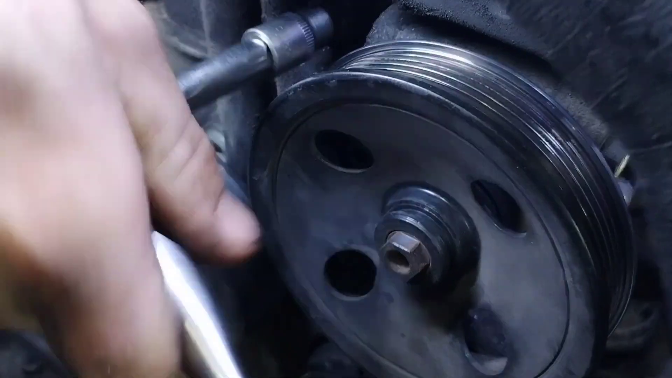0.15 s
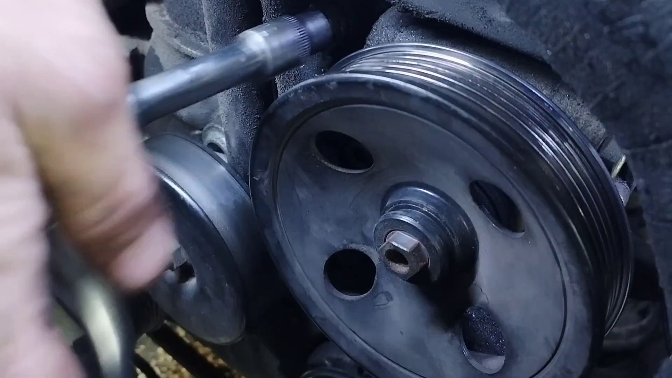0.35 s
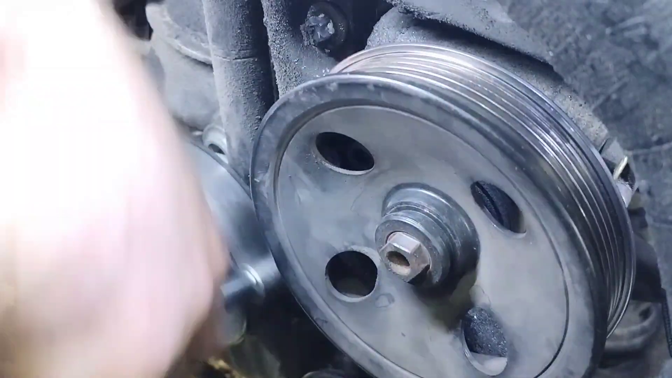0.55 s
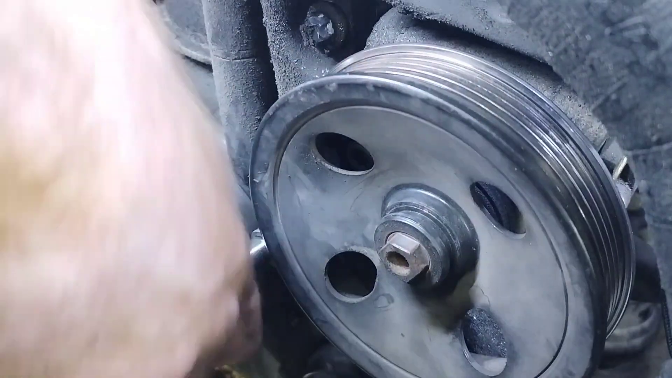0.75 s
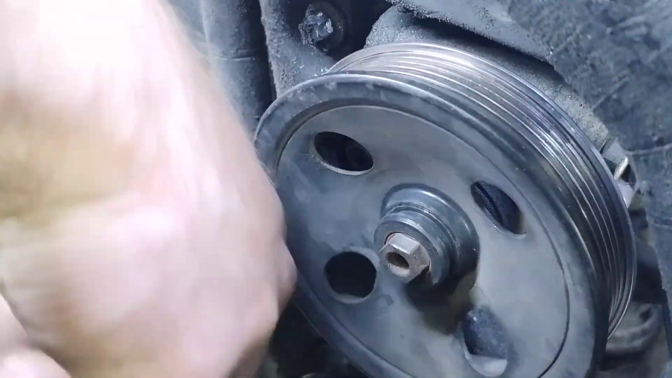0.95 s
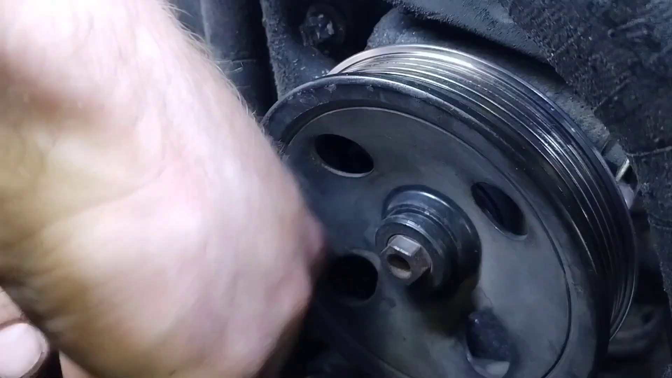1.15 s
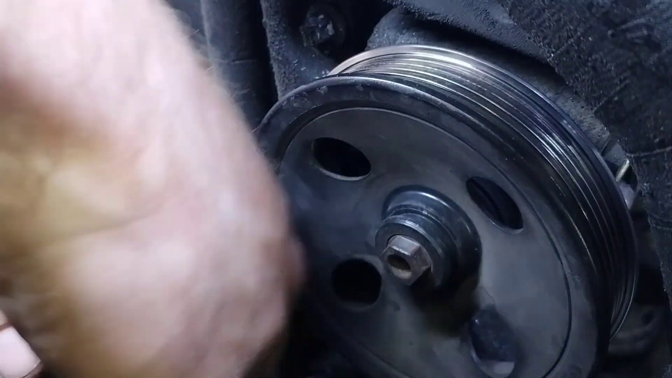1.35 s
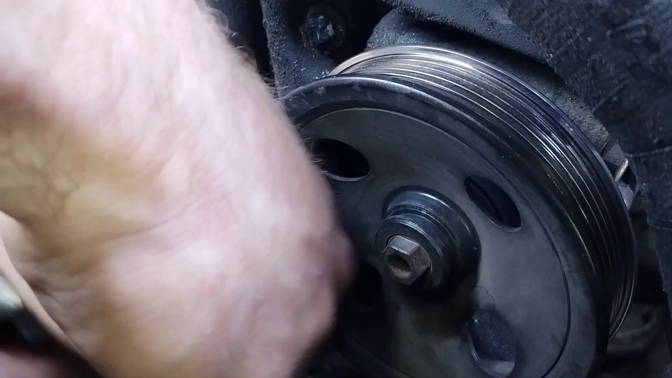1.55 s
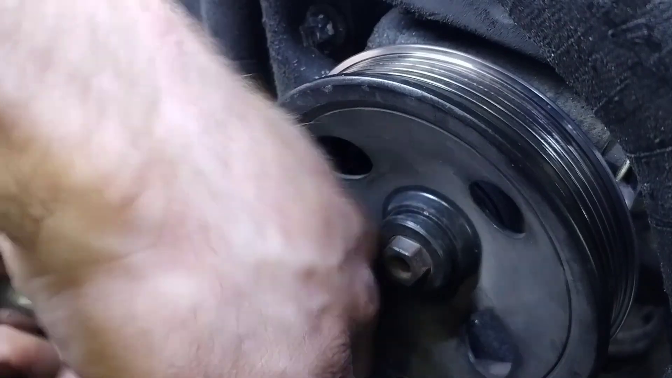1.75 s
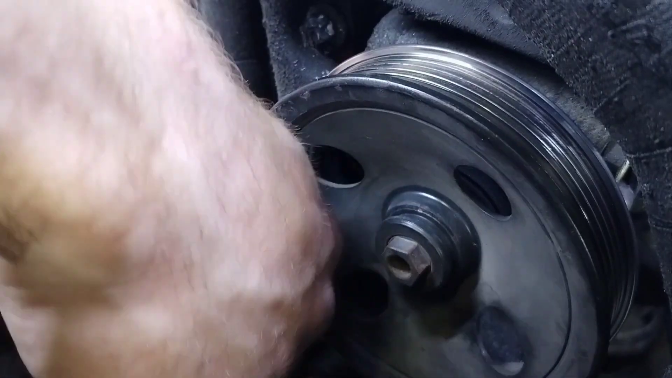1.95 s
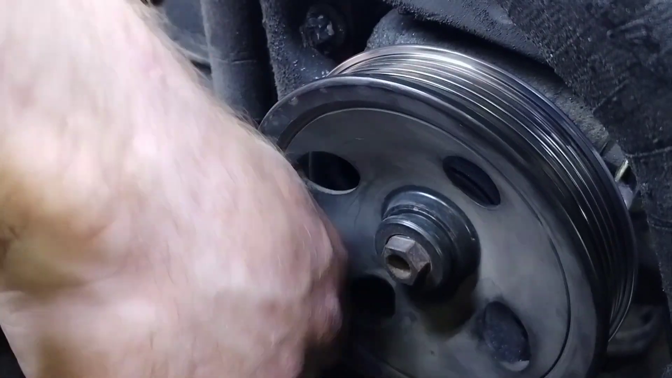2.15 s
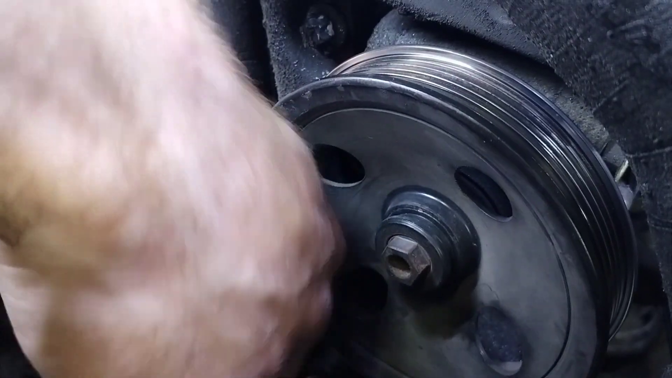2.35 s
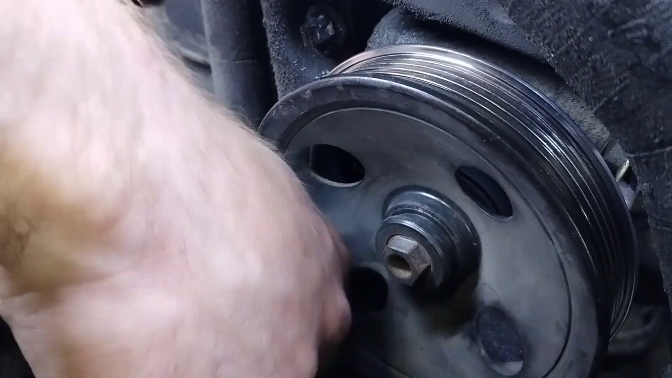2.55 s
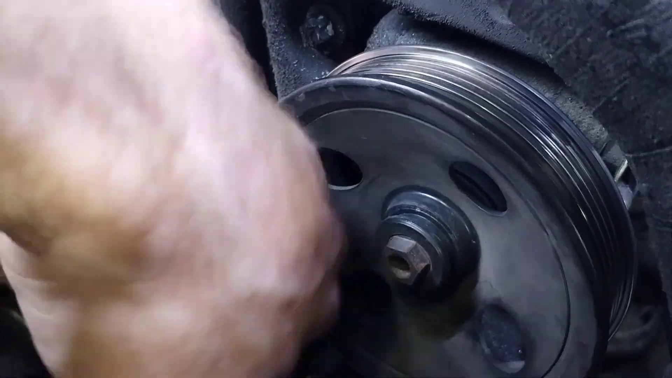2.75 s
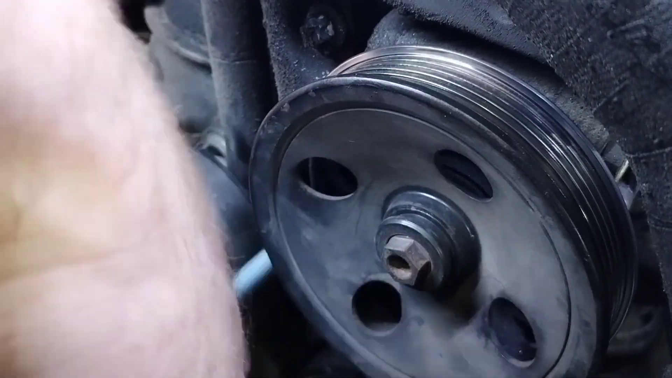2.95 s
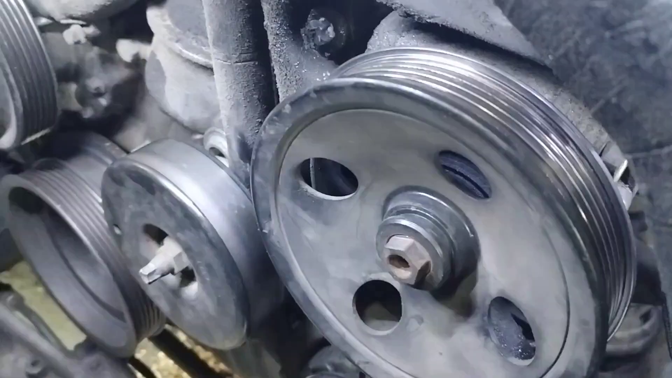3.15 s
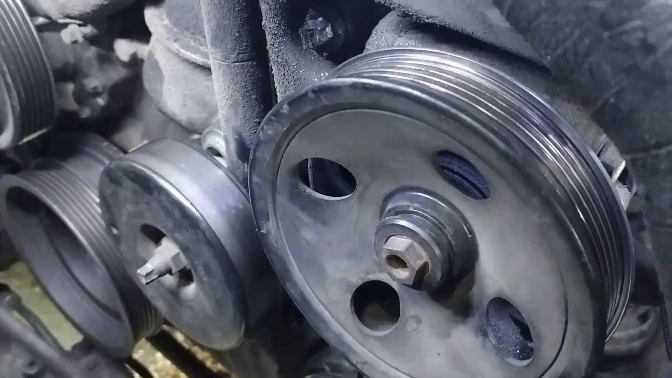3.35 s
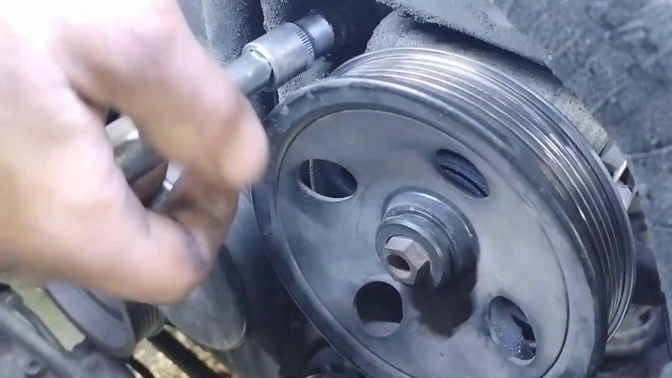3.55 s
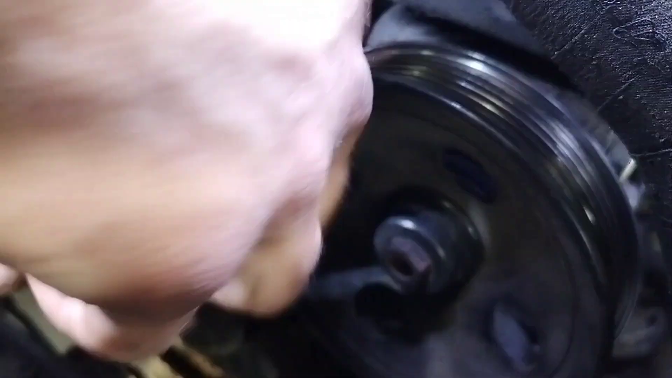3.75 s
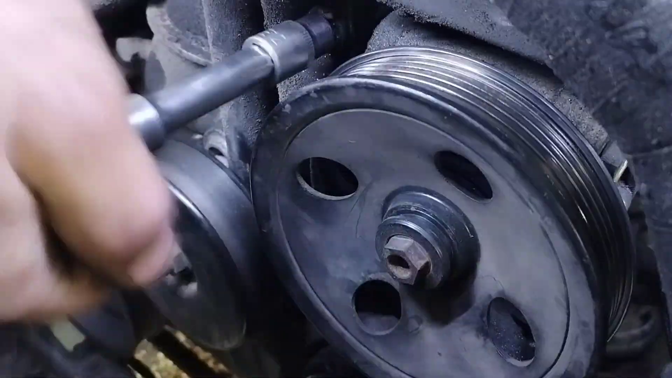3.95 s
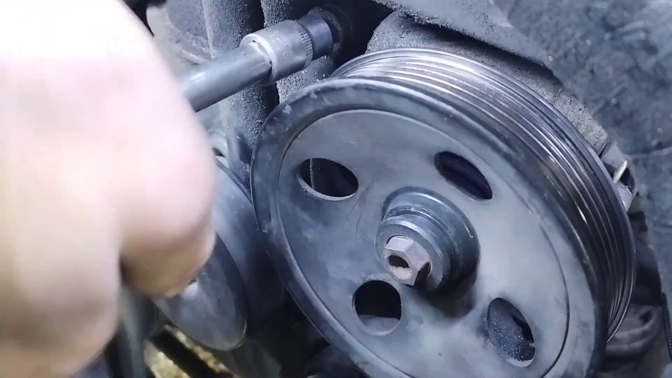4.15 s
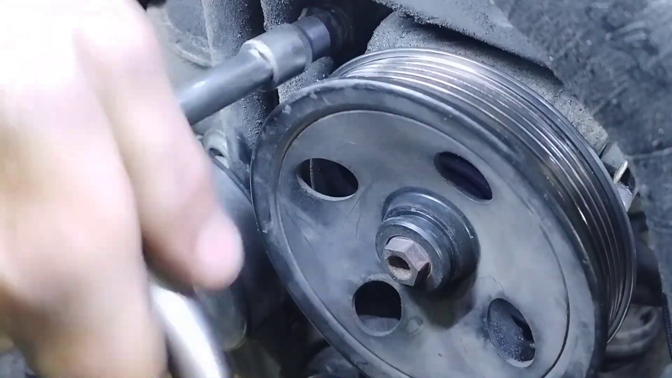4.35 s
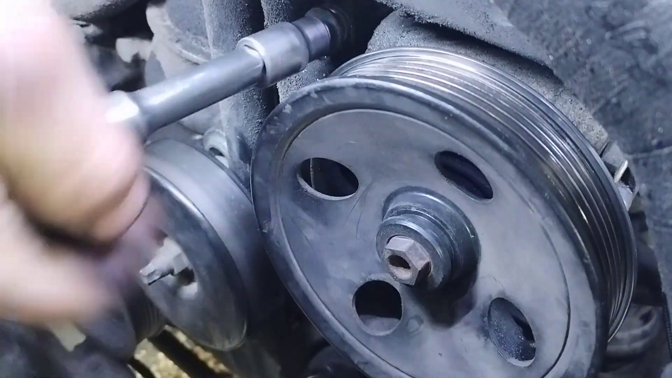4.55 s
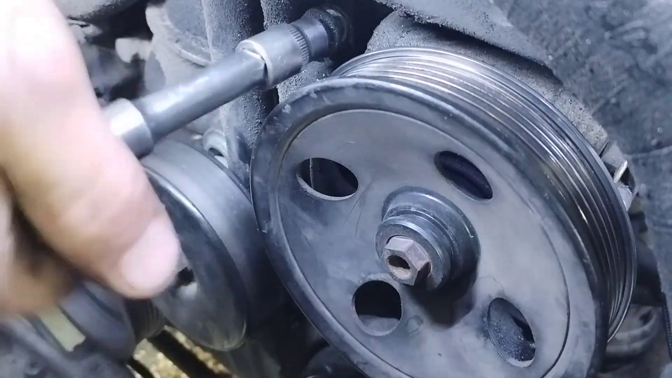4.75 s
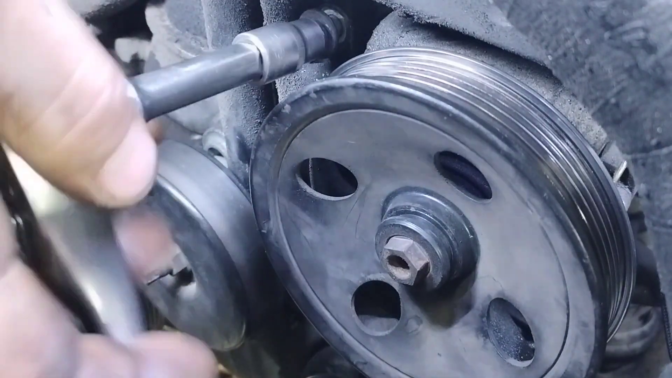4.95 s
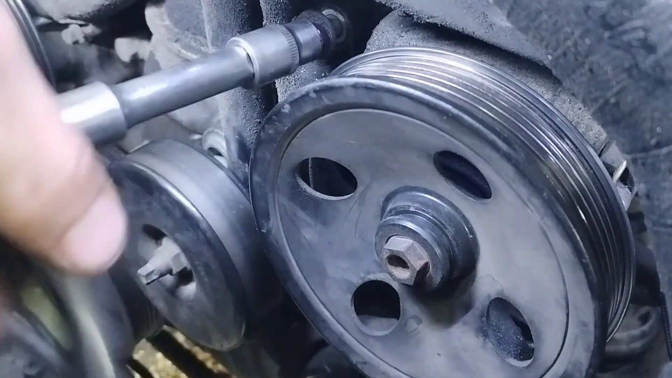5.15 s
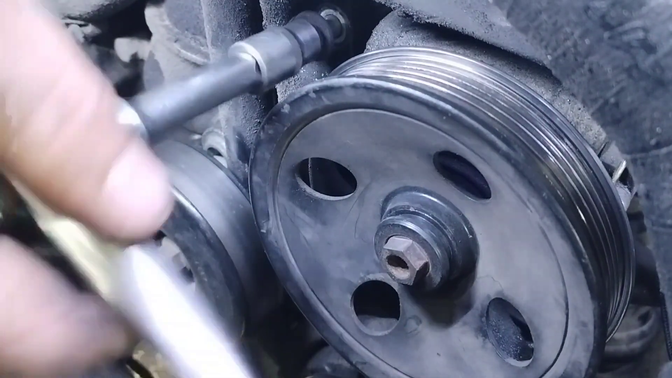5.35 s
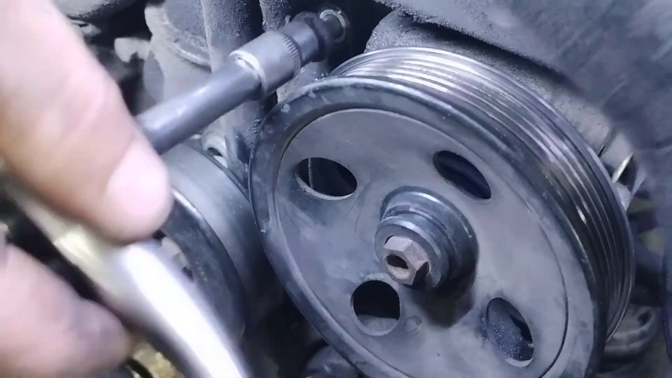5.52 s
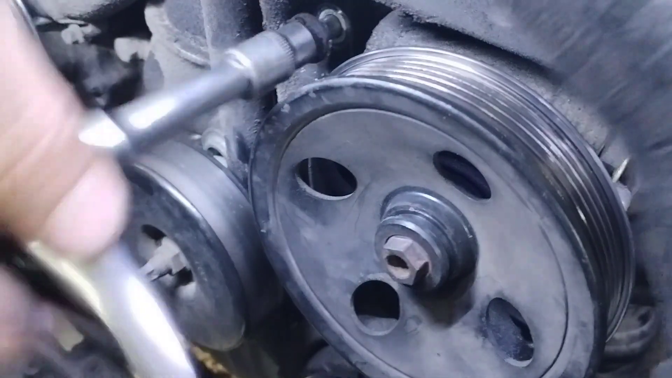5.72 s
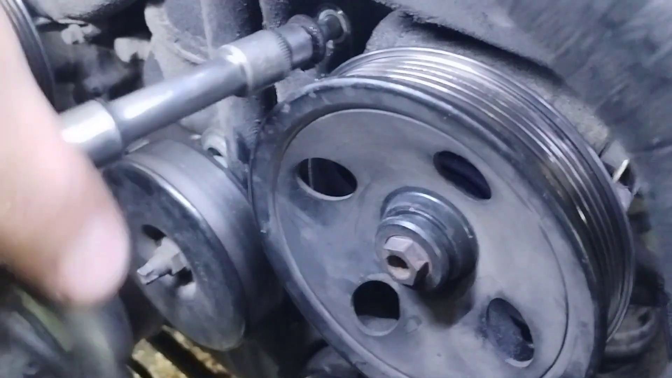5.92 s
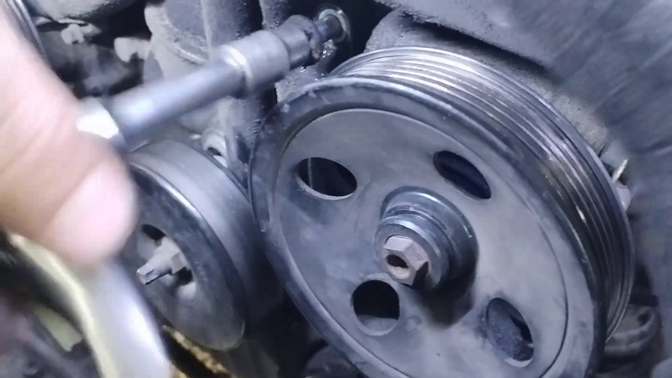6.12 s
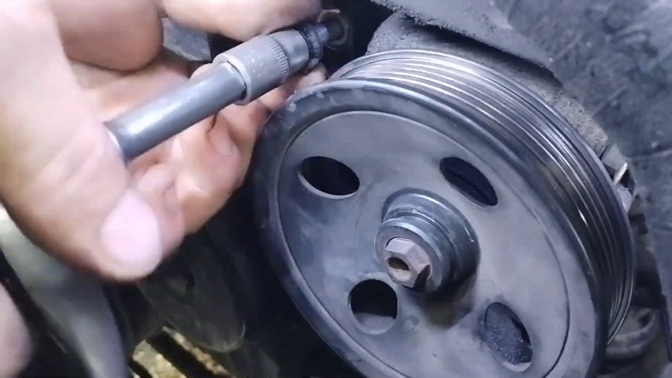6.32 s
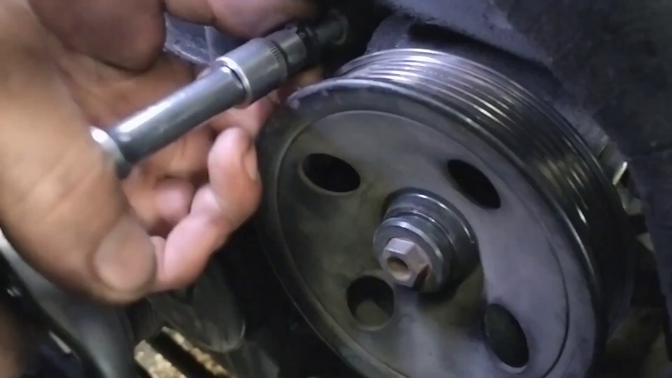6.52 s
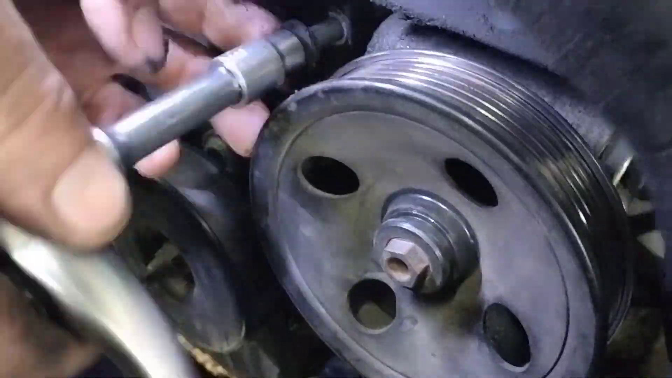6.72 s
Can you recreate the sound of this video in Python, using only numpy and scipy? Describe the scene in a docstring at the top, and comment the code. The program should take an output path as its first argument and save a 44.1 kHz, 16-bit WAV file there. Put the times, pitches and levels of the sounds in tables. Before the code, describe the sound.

A mechanic's hand tool, heard close in stereo with the engine silent. Crisp ratchet clicks come in bursts at first, with one short ringing chime. The middle is sparse: faint finger ticks, then bumps, clinks and light socket taps. Afterward rapid bright clicking strokes return and persist, mixed with metallic knocks, hand rustle and a soft lumpy low rumble.

```python
"""A socket ratchet works bolts in an engine bay, close by, with the engine off.
It opens on a knock and a first quick run; a steel tool chimes at half a second, then more runs follow.
In the middle the tool clinks and bumps as it is moved, and a loose socket is tapped as it is fitted.
From about 3.9 s runs of strokes return to the end, among knocks: a pawl drags over teeth, ringing steel.
Rustle, finger ticks and a lumpy low rumble lie beneath: filtered noise and tiny random contacts."""
import sys
import numpy as np
from scipy import signal
from scipy.fft import rfft, irfft
from scipy.io import wavfile
from scipy.ndimage import uniform_filter1d

SR = 44100
rng = np.random.default_rng(int(sys.argv[2]) if len(sys.argv) > 2 else 0)


def dump_mix(stems):
    """Bounce the given channels to the path in sys.argv[1] as a 16-bit WAV at rate SR."""
    frames = np.atleast_2d(stems).T  # one column per channel
    limited = np.clip(frames, -1, 1)  # hard clip at full scale
    pcm = np.round(limited * 32767).astype(np.int16)
    wavfile.write(sys.argv[1], SR, pcm)


N = 303584  # samples

# Evenly paced runs of ratchet strokes, before the hand's spread:
# [first t/s, last t/s, strokes, stroke length/s, head level/dB, rattle level/dB, swell first to last/dB]
STROKE_RUNS = [(0.038, 0.179, 4, 0.0098, -23.5, -34, -4), (0.796, 0.983, 3, 0.022, -30.5, -44.5, 12.5),
               (1.062, 1.176, 3, 0.032, -24.5, -45.5, -3), (1.232, 1.386, 4, 0.023, -23.5, -46, 7.5),
               (3.907, 4.106, 5, 0.02, -25, -39, -1.5), (4.256, 4.4, 4, .011, -26, -40, -0.5),
               (4.541, 4.676, 4, 0.022, -24.5, -37, 2), (4.727, 4.863, 4, .016, -23.5, -38.5, 3.5),
               (4.911, 5, 3, 0.016, -27.5, -39, -8.5), (5.047, 5.204, 5, .015, -22, -36.5, 0),
               (5.23, 5.348, 4, 0.019, -24, -34.5, -1.5), (5.386, 5.673, 8, .017, -22, -38.5, -0.5),
               (5.706, 6.07, 10, .024, -23, -35, 1), (6.106, 6.296, 6, 0.023, -25.5, -41.5, -6.5),
               (6.394, 6.487, 3, 0.036, -27.5, -43, -3.5), (6.579, 6.827, 7, .018, -24, -41.5, -2)]
# Single clinks as the tool is lifted, moved and seated: [t/s, length/s, head level/dB, rattle level/dB]
TOOL_CLINKS = [(0.002, 0.0041, -30, -61), (0.234, 0.0058, -25, -32), (0.263, .022, -30.5, -38.5),
               (0.341, 0.018, -27.5, -44), (0.456, 0.0068, -33.5, -33.5), (0.595, .009, -24, -29),
               (1.523, 0.0071, -16, -30), (1.761, 0.008, -32, -50), (1.804, .012, -35.5, -54),
               (1.92, 0.0049, -40, -51), (1.986, 0.0068, -40, -65), (2.009, 0.0076, -61, -47.5),
               (2.107, 0.015, -59.5, -55.5), (2.343, 0.0075, -49, -47.5), (2.39, 0.013, -56.5, -56),
               (2.522, .009, -52.5, -54), (2.797, 0.0056, -49.5, -35), (2.886, 0.013, -36, -36.5),
               (2.958, .025, -30.5, -34.5), (3.079, .006, -29, -39.5), (3.382, 0.0015, -30.5, -68),
               (3.409, 0.0052, -33.5, -30.5), (3.434, .012, -38, -50), (3.479, 0.0071, -19, -35.5),
               (3.682, 0.0048, -27, -28), (3.714, 0.027, -34, -39.5), (4.451, .03, -23.5, -40)]
# Ringing of the steel ratchet head: [f/Hz, relative level/dB]
HEAD_SPECTRUM = [(2000, -41.5), (3000, -11.5), (3700, -9), (4300, -2), (5000, -6.5), (5600, -7), (7000, -4),
                 (7900, 2), (8800, 2), (10200, -10), (14200, -17), (14600, -43.5)]
# Lower, fuller tilt added to the head on the first bolt: [f/Hz, added level/dB]
FIRST_BOLT_TILT = [(3000, 3), (4600, 2), (7000, 1), (13000, 1.5)]
# Rattle of socket and handle: [f/Hz, relative level/dB]
RATTLE_SPECTRUM = [(60, -27.5), (400, -9), (650, -1), (950, -3.5), (1700, 2.5), (2800, 3), (3500, -4.5),
                   (5000, -28.5), (14000, -42), (15500, -61.5)]
# Tool and hand bumping the engine: [t/s, contact length/s, thud level/dB, clank level before trim/dB]
ENGINE_KNOCKS = [(0.002, 0.0051, -18.5, -22), (0.088, 0.004, -12, -13.5), (0.098, 0.0098, -26, -20),
                 (0.131, 0.013, -35, -41), (0.411, 0.0078, -25.5, -26), (0.819, 0.054, -51, -62.5),
                 (1.541, .014, -36, -38), (1.615, 0.018, -29.5, -45.5), (1.804, 0.0064, -37.5, -25.5),
                 (2.45, 0.029, -53.5, -77), (2.941, 0.0052, -13.5, -24), (2.977, 0.0053, -21.5, -29.5),
                 (3.019, 0.0062, -34, -61), (3.095, 0.0087, -24, -27.5), (3.17, 0.013, -29, -28),
                 (3.265, 0.02, -38.5, -46), (3.48, 0.0072, -33, -27.5), (4.17, 0.011, -38.5, -48),
                 (4.309, 0.0061, -29.5, -19.5), (4.915, 0.00477, -31, -23.5), (5.273, 0.0037, -17.5, -18),
                 (5.313, 0.0047, -16, -9.5), (5.346, 0.0079, -26.5, -23.5), (5.51, 0.016, -32.5, -29.5),
                 (6.164, 0.0067, -30.5, -36), (6.403, 0.016, -22.5, -22.5), (6.453, 0.021, -29, -51),
                 (6.5, 0.0072, -22, -32)]
# Lower and upper thud modes, and the clanking handle: [f/Hz, relative level/dB]
LOW_THUD_SPECTRUM = [(30, -33), (170, -3.5), (350, 3), (450, -4), (1500, -54)]
HIGH_THUD_SPECTRUM = [(250, -34), (490, 0), (600, -3.5), (710, -2.5), (850, -8.5), (1100, -10.5),
                      (3000, -60.5), (15000, -81.5)]
CLANK_SPECTRUM = [(900, -33.5), (1100, -7.5), (1400, -4), (1680, 0), (1850, 1), (2150, -7.5), (3300, -11),
                  (8000, -18.5), (14000, -31.5), (15500, -61)]
# Tool sliding against hand and engine, before the lumps: [start t/s, end t/s, hiss level/dB]
TOOL_SLIDES = [(0, .58, -58.5), (.6, 1.48, -60), (2.88, 3.13, -57.5), (3.77, 3.83, -60.5), (6.5, 6.58, -50)]
# Taps on the loose socket: [t/s, level/dB]
LOOSE_SOCKET_TAPS = [(2.797, -44), (3.17, -39.5), (3.409, -35.5), (3.436, -37)]
# Ringing modes of the loose socket: [f/Hz, relative level/dB, t60/s]
SOCKET_MODES = [(2930, -2, 0.081), (5300, -10.5, .045), (6850, -9, 0.057)]
# Bending modes of the chiming steel tool: [f/Hz, relative level/dB, t60/s]
CHIME_MODES = [(870, -23, .3), (1020, -21.5, 0.17), (2216, -22.5, 0.75), (3528, -6, 0.07),
               (5060, -10.5, 0.16), (6880, -1, 0.054), (8980, 1.5, 0.034), (11290, -10.5, 0.026),
               (13970, -25.5, .06)]
# Shuffling of hands and tool: [t/s, rustle level before trim and lumps/dB]
RUSTLE_CURVE = [(0.0, -64), (0.21, -50.5), (0.38, -62), (0.69, -60.5), (1.38, -69.5), (1.65, -53),
                (1.88, -92), (2.28, -79.5), (3.05, -56), (3.51, -71), (3.91, -57), (4.16, -54.5),
                (4.46, -61), (4.96, -56), (5.14, -51.5), (5.73, -54.5), (5.96, -52), (6.88, -53.5)]
# Tone of the shuffling: [f/Hz, relative level/dB]
RUSTLE_SPECTRUM = [(60, -28.5), (200, -10), (270, -6.5), (345, 0), (430, -9.5), (1100, -19.5), (1800, -22),
                   (3500, -29), (6500, -37), (8300, -26.5), (10500, -40), (14000, -46), (15500, -65.5)]
# Rise and fall of the low rumble: [t/s, level before trim and lumps/dB]
RUMBLE_CURVE = [(0, -60), (.35, -64), (1.099, -85), (2.25, -80.5), (2.458, -55.5), (2.65, -77.5),
                (3.051, -48), (3.55, -70.5), (4.9, -82), (5.5, -58.5), (6.1, -49.5), (6.34, -59),
                (6.48, -41), (6.7, -63), (6.88, -41.5)]
# Tone of the low rumble: [f/Hz, relative level/dB]
RUMBLE_SPECTRUM = [(20, -9), (70, -4), (140, -5.5), (600, -50.5)]
# Left-right likeness at the two microphone ports: [f/Hz, correlation]
PORT_LIKENESS = [(60, 0.94), (300, 0.6), (600, 0.88), (1150, -0.5), (1700, 0.33), (2600, -0.23),
                 (4000, -0.01), (6000, 0.01)]
# Balance of the two ports: [f/Hz, left minus right level/dB]
PORT_BALANCE = [(500, -2), (1700, -3.5), (2700, 1), (4300, -2), (7100, 2.5), (7950, 9), (8900, -1),
                (12000, 1.5)]
# Level below which the noise suppressor turns a band down: [f/Hz, level per Hz/dB]
QUIET_THRESHOLD = [(100, -116), (400, -112), (1500, -111), (4000, -112), (8300, -114), (14000, -114)]

TEETH_PER_S = 165  # typical pace; it differs a little from stroke to stroke
LEAD_S = .005  # the parts scrape for this long before they catch
FIRST_BOLT_END_S = 2.5
# The hand is not a machine: spread of a run's strokes in time, strength and (log) length
STROKE_JITTER_S, STROKE_SPREAD_DB, LENGTH_SPREAD = 0.0012, 2.63, 0.24
RATTLE_SPREAD_DB = -1  # the socket sits more or less loosely at each stroke
# Hard drops of the pawl: share of the strokes, level over the stroke, level cap on the snaps
SNAP_CHANCE, SNAP_DB, SNAP_CAP_DB = 0.34, 5, -17
# A brief contact is a hard one: thud modes are even at this length; upper over lower gains per halving
EVEN_CONTACT_S, HARD_DB_PER_HALVING = 0.011, 8.5
DRAG_DB = -33.5  # rub of the socket on the bolt, relative to the strokes of its run
HISS_FLOOR_DB = -74  # faint steady hiss underneath, between the rubs and slides; before the lumps
CHIME_S, CHIME_DAMPED_S, CHIME_DB = 0.495, .594, -20
CUTOFF_HZ, FULL_SCALE = 15600, .9


def ratchet():
    """The teeth ring the steel head brightly and rattle the socket and handle lower down."""
    out = np.zeros((2, N))
    head, rattle = colour(HEAD_SPECTRUM), colour(RATTLE_SPECTRUM)
    first_head = colour([(hz, db + read(FIRST_BOLT_TILT, hz)) for hz, db in HEAD_SPECTRUM])
    worked = strokes()
    for s, length, head_db, rattle_db in worked + list(TOOL_CLINKS):
        steel = first_head if s < FIRST_BOLT_END_S else head
        clicks = pawl(length)
        bright = ring(scatter(clicks, t60=0.016, direct=0.53), steel)
        add(out, s - LEAD_S, at_level(bright, head_db, length))
        body = ring(scatter(clicks, t60=0.052, direct=0.46), rattle)
        add(out, s - LEAD_S, at_level(body, rattle_db, length))

    for s, length, head_db, _ in worked:
        luck, place = rng.random(2)
        snap_db = min(head_db + SNAP_DB, SNAP_CAP_DB)
        snap = at_level(ring(scatter(np.ones(1), t60=.014, direct=.9), head), snap_db, .002)
        add(out, s + place * length, snap * (luck < SNAP_CHANCE))
    return out


def strokes():
    """Spreads runs into (t/s, length/s, head/dB, rattle/dB); shorter strokes concentrate the same energy."""
    rows = []
    for first, last, count, length, head_db, rattle_db, swell_db in STROKE_RUNS:
        for along in np.linspace(0, 1, round(count)):
            late, strong, long, loose = rng.standard_normal(4)
            s = first + along * (last - first) + STROKE_JITTER_S * late
            stretch = np.exp(LENGTH_SPREAD * long)
            effort_db = swell_db * (along - .5) + STROKE_SPREAD_DB * strong
            effort_db -= 10 * np.log10(stretch)
            loose_db = RATTLE_SPREAD_DB * loose
            rows.append((s, length * stretch, head_db + effort_db, rattle_db + effort_db + loose_db))
    return rows


def pawl(length, grit=0.26, rebound=0.35, rebound_s=0.0015, uneven_db=2.0, count=12):
    """The pawl drops over evenly spaced teeth, rebounds after each and scrapes up the next."""
    clicks = grit * chatter(length, per_s=2200, spread_db=6.5)
    pace = TEETH_PER_S * amp(1.6 * rng.standard_normal())
    teeth = LEAD_S + np.arange(count) / pace
    sizes = amp(uneven_db * rng.standard_normal(count))
    sizes[0] = 1.0  # the first tooth lets go firmly
    for delay, share in ((0, 1), (rebound_s, rebound)):
        at = ((teeth + delay * (.5 + rng.random(count))) * SR).astype(int)
        inside = at < len(clicks)
        clicks[at[inside]] += share * sizes[inside]
    return clicks


def knocks(clank_trim_db=-2.0, settle=0.51):
    """A blow and a short settling chatter shake the engine cover and clank the handle."""
    out = np.zeros((2, N))
    low, high, clank = colour(LOW_THUD_SPECTRUM), colour(HIGH_THUD_SPECTRUM), colour(CLANK_SPECTRUM)
    for s, length, thud_db, clank_db in ENGINE_KNOCKS:
        blow = settle * chatter(length, per_s=1200, spread_db=3.5)
        blow[int(LEAD_S * SR)] = 1
        hard_db = HARD_DB_PER_HALVING * np.log2(EVEN_CONTACT_S / length)
        upper = 1 / (1 + amp(-2 * hard_db))  # share of the energy in the upper modes
        low_thud = at_level(ring(scatter(blow, t60=0.033, direct=0.77), low), thud_db, length)
        high_thud = at_level(ring(scatter(blow, t60=0.024, direct=0.89), high), thud_db, length)
        thud = np.sqrt(1 - upper) * low_thud + np.sqrt(upper) * high_thud
        handle = ring(scatter(blow, t60=0.017, direct=0.16), clank)
        add(out, s - LEAD_S, thud + at_level(handle, clank_db + clank_trim_db, length))
    return out


def drag(lumps_db=4, lumps_per_s=70, overrun_s=.02):
    """Steel rubs as the socket turns and the tool slides: lumpy bright noise over a faint hiss floor."""
    t = np.arange(N) / SR
    gain = np.full(N, amp(HISS_FLOOR_DB))
    turning = [(first, last + overrun_s, head_db + DRAG_DB)
               for first, last, _, _, head_db, _, _ in STROKE_RUNS]
    for start, end, db in turning + list(TOOL_SLIDES):
        moving = (t > start) & (t < end)
        gain[moving] += amp(db) * signal.windows.tukey(moving.sum(), .1)
    rub = at_level(ring(rng.standard_normal((2, N)), colour(HEAD_SPECTRUM))[:, :N], 0, N / SR)
    return rub * gain * amp(lumps_db * wander(t, lumps_per_s))


def socket(size=5000):
    """The loose socket rings briefly at each tap, as a few decaying sine modes."""
    out = np.zeros((2, N))
    t = np.arange(size) / SR
    for s, tap_db in LOOSE_SOCKET_TAPS:
        for hz, db, t60 in SOCKET_MODES:
            decay = amp(tap_db + db - 60 * t / t60)
            add(out, s, decay * np.sin(2 * np.pi * (hz * t + rng.random((2, 1)))))
    return out


def chime(swell_s=0.018, linger_db=-27, waver_db=3, waver_per_s=120, waver_rad=0.98):
    """A glancing slide sets a steel bar ringing; it sings on unevenly until the hand stops it."""
    t = np.arange(int((CHIME_DAMPED_S - CHIME_S) * SR)) / SR
    shape = np.minimum(t / swell_s, 1) ** 0.88 * signal.windows.tukey(len(t), .1)
    out = np.zeros((2, len(t)))
    for hz, db, t60 in CHIME_MODES:
        # each mode dies away onto a faint steady remainder
        decay = amp(db - 60 * np.maximum(t - swell_s, 0) / t60) + amp(db + linger_db)
        phase = 2 * np.pi * (hz * t + rng.random()) + waver_rad * wander(t, waver_per_s)
        phase = phase + np.array([[0], [1]])  # right is one radian ahead
        out += decay * amp(waver_db * wander(t, waver_per_s)) * np.sin(phase)
    return amp(CHIME_DB) * shape * out


def fidget(db=-64, spread_db=4, length=0.016, count=80):
    """Fingers shift the loose tool with faint ticks, one at random in each equal slice of time."""
    out, rattle = np.zeros((2, N)), colour(RATTLE_SPECTRUM)
    for k in range(count):
        contacts = chatter(length, per_s=970, spread_db=3.5)
        tick = ring(scatter(contacts, t60=0.042, direct=0.54), rattle)
        s = (k + rng.random()) / count * N / SR
        add(out, s, at_level(tick, db + spread_db * rng.standard_normal(), length))
    return out


def shuffle(spectrum, curve, trim_db, lumps_db, lumps_per_s, biggest=2.4):
    """Coloured noise follows a level curve in uneven lumps, none of them huge."""
    t = np.arange(N) / SR
    noise = at_level(ring(rng.standard_normal((2, N)), colour(spectrum))[:, :N], 0, N / SR)
    lumps = np.minimum(wander(t, lumps_per_s), biggest)
    return noise * amp(np.interp(t, *np.transpose(curve)) + trim_db + lumps_db * lumps)


def bay(x, t60=0.21, size=9000):
    """The short tail of the open engine bay: decaying noise as an echo pattern."""
    t = np.arange(size) / SR
    tail = rng.standard_normal((2, size)) * amp(-60 * t / t60)
    tail /= np.linalg.norm(tail, axis=1, keepdims=True)
    return signal.fftconvolve(x, tail, axes=1)[:, :N]


def chatter(length, per_s, spread_db, size=4096):
    """Random tiny contacts of uneven size, which build up during the lead-in."""
    t = np.arange(size) / SR
    struck = rng.random(size) < per_s / SR
    contacts = struck * rng.choice([-1, 1], size) * amp(spread_db * rng.standard_normal(size))
    build = np.minimum(t / LEAD_S, 1) ** 2
    return (contacts * build)[t < LEAD_S + max(length, .002)]


def scatter(clicks, t60, direct, size=2000):
    """Each click arrives directly and with a dense cloud of echoes from the metal close by."""
    t = np.arange(size) / SR
    cloud = rng.standard_normal((2, size)) * amp(-60 * t / t60)
    cloud /= np.linalg.norm(cloud, axis=1, keepdims=True)
    cloud[0, 0] += direct
    cloud[1, rng.integers(2, 20)] += direct
    return signal.fftconvolve(clicks[None], cloud, axes=1)


def colour(points, size=2048):
    """Causal stereo filters: one for what the ports share, one for what they hear in opposition."""
    hz = np.fft.rfftfreq(size, 1 / SR)
    alike = np.clip(read(PORT_LIKENESS, hz), -.95, .95)
    gain = amp(read(points, hz) + np.outer([.5, -.5], read(PORT_BALANCE, hz)))
    log_gain = np.log(gain * np.sqrt([[1 + alike], [1 - alike]]) + 1e-6)
    # folding the cepstrum gives minimum phase: the ringing only follows the blow
    cepstrum = irfft(log_gain)
    cepstrum[..., 1:size // 2] *= 2
    cepstrum[..., size // 2 + 1:] = 0
    taps = irfft(np.exp(rfft(cepstrum)))[..., :size // 2]
    taps[1, 1] *= -1  # the opposed part is inverted on the right
    return taps


def ring(drive, taps):
    """Two unrelated drives through a stereo colour."""
    return signal.fftconvolve(drive[:, None], taps, axes=2).sum(0)


def wander(t, per_s, size=1000):
    """A random value that drifts to a new place per_s times a second."""
    return np.interp(t * per_s, np.arange(size), rng.standard_normal(size))


def at_level(sound, db, length):
    """Gives a sound the energy of the level db held for length seconds."""
    energy = np.mean(np.sum(sound ** 2, -1)) + 1e-20
    return sound * amp(db) * np.sqrt(length * SR / energy)


def add(mix, s, sound):
    """Lays a stereo sound into the mix at time s."""
    part = mix[:, max(0, round(s * SR)):][:, :sound.shape[1]]
    part += sound[:, :part.shape[1]]


def read(points, hz):
    """A spectrum, joined by straight lines over log frequency."""
    f, value = np.transpose(points)
    return np.interp(np.log(hz + 1), np.log(f + 1), value)


def amp(db):
    """Decibels to amplitude."""
    return 10 ** (np.asarray(db) / 20)


def scene(bay_db=-24):
    """Tool, engine and hands in the bay, over a low rumble."""
    tool = ratchet() + knocks() + drag() + socket()
    add(tool, CHIME_S, chime())
    rustle = shuffle(RUSTLE_SPECTRUM, RUSTLE_CURVE, trim_db=1.5, lumps_db=10.0, lumps_per_s=50)
    rumble = shuffle(RUMBLE_SPECTRUM, RUMBLE_CURVE, trim_db=-0.5, lumps_db=5, lumps_per_s=32)
    return tool + amp(bay_db) * bay(tool) + rustle + rumble + fidget()


def record(dry, depth_db=-11, size=256):
    """A noise suppressor turns down the quietest bands; then a hard ceiling and a band limit."""
    hz, _, z = signal.stft(dry, SR, nperseg=size, scaling="psd")
    power = (abs(z) ** 2).mean(0)
    # smoothed over neighbouring bands, then over time
    power = uniform_filter1d(power, size=3, axis=0)
    power = uniform_filter1d(power, size=3, axis=1).clip(0)
    threshold = amp(read(QUIET_THRESHOLD, hz))[:, None] ** 2
    shut = 1 / (1 + power / threshold)  # 0 open, 1 turned down fully
    clean = signal.istft(z * amp(depth_db * shut), SR, nperseg=size, scaling="psd")[1][:, :N]
    clean = np.clip(clean, -FULL_SCALE, FULL_SCALE)
    low_pass = signal.firwin(255, CUTOFF_HZ, window=("kaiser", 9), fs=SR)
    return signal.oaconvolve(clean, low_pass[None], "same", axes=1)


dry = scene()
out = record(dry)
dump_mix(out)
```